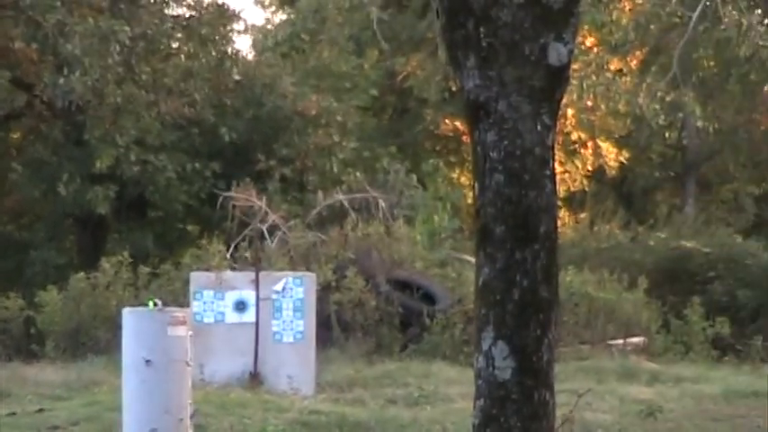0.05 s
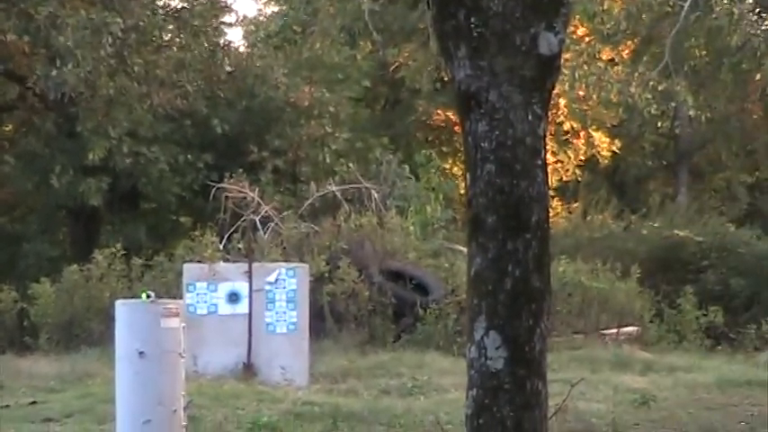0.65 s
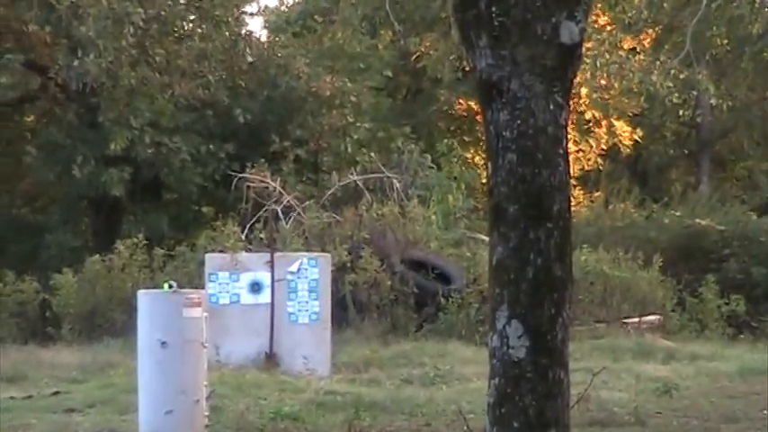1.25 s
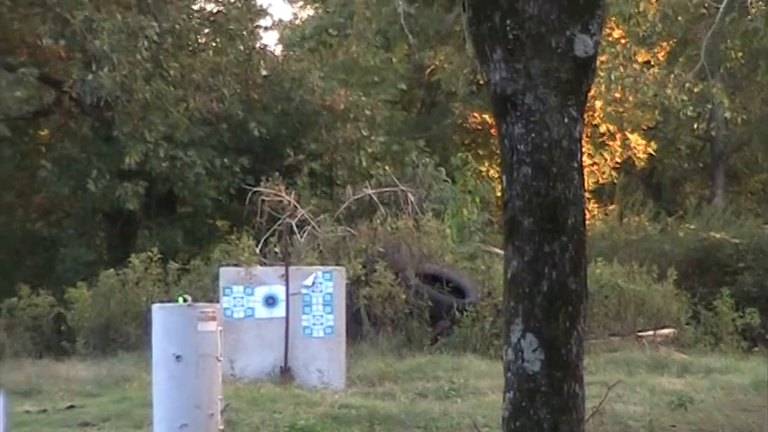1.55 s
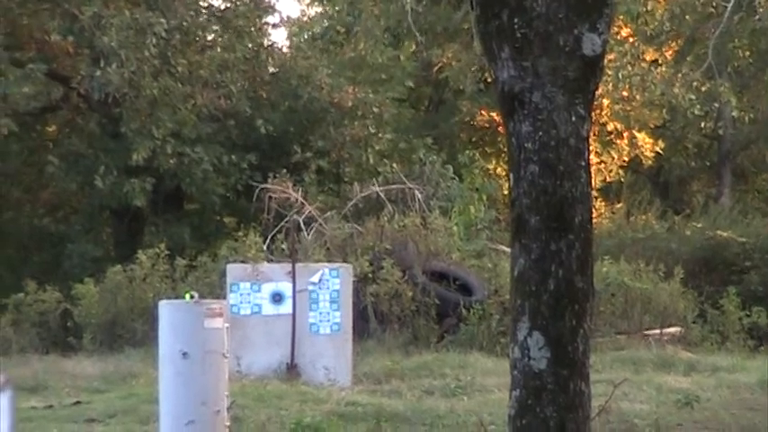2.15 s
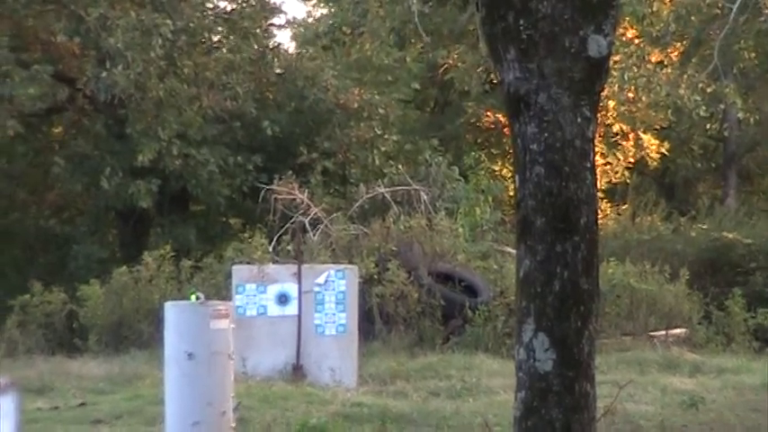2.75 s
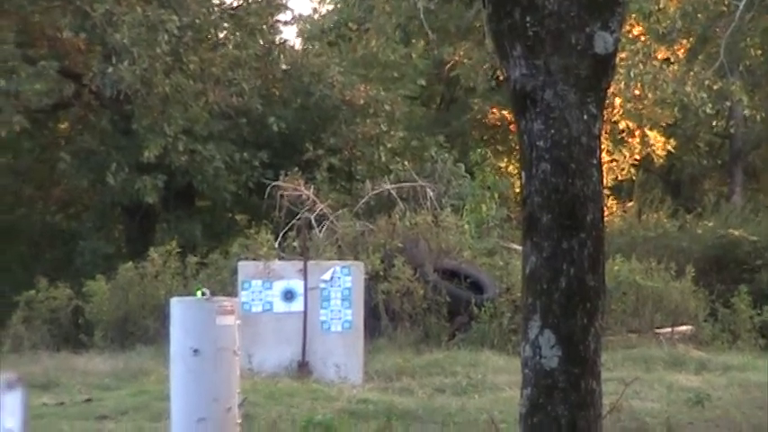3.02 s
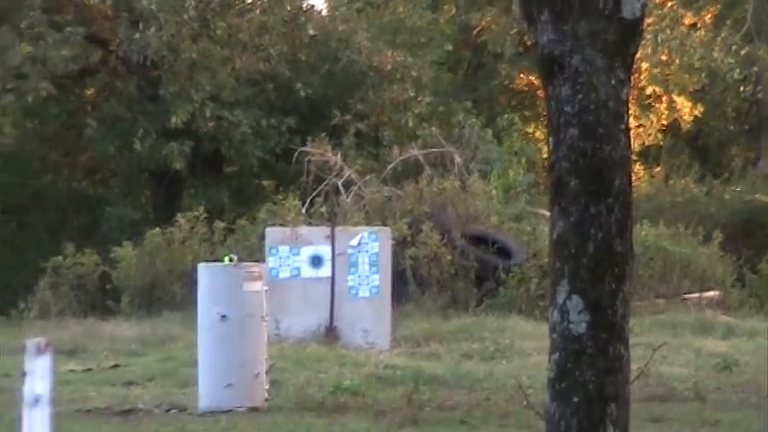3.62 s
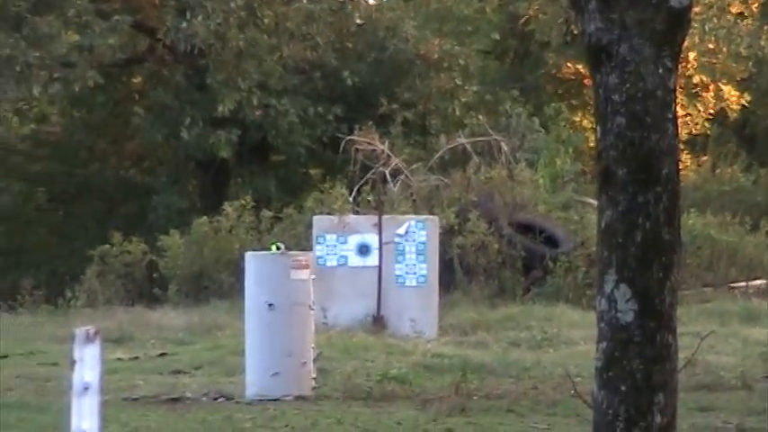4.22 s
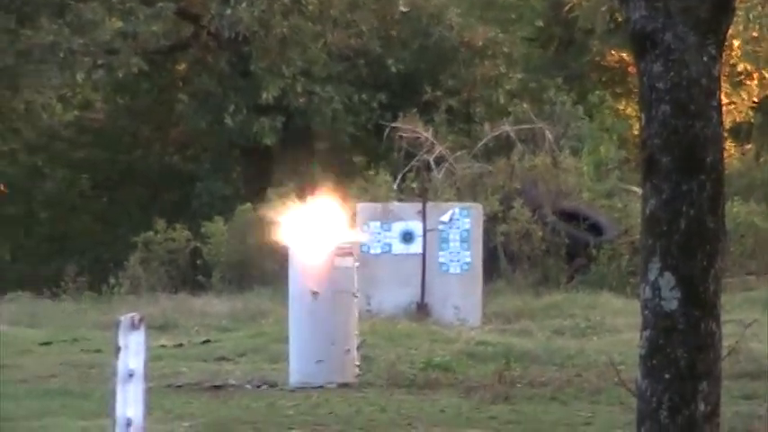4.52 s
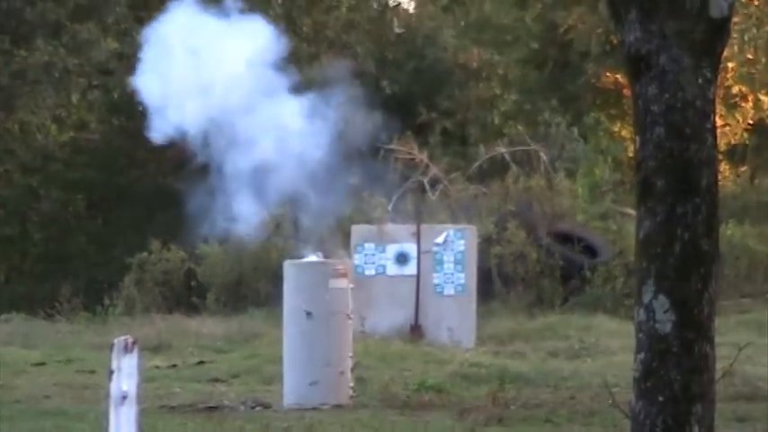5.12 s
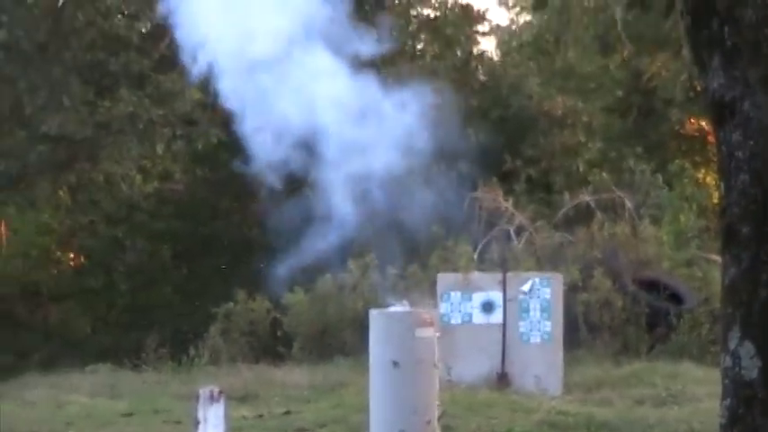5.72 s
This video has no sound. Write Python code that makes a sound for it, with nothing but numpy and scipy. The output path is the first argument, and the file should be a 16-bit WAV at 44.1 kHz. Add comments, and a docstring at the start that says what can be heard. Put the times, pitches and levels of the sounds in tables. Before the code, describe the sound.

Crickets trill faintly, near and far, over a steady hiss at the edge of a field, while a light breeze nudges the microphone. After several seconds a rifle fires close by and a target explodes, merging into one very loud, sharp bang that briefly overloads the microphone. Echoes roll back from the woods, growing duller, and under them the spent brass case lands with a thin ring and tumbles into the grass.

```python
"""A field's edge at dusk, stereo microphone. Over its steady hiss crickets trill with their wings, near
and far, and a light breeze nudges the ports. At about 4.5 s a rifle fires close by and overloads the
input; the exploding target's shock front follows, and both roll back from the woods, ever duller.
Under the echoes the spent brass case lands with a thin ring and tumbles into the grass."""
import sys
import numpy as np
from scipy import signal
from scipy.fft import rfft, irfft, next_fast_len
from scipy.io import wavfile

SR = 44100
rng = np.random.default_rng(int(sys.argv[2]) if len(sys.argv) > 2 else 0)


def persist_wave(psi):
    """Save psi, clipped to +-1, as 16-bit WAV."""
    counts = np.round(np.clip(psi, -1, 1) * 32767).astype(np.int16)
    wavfile.write(sys.argv[1], SR, np.atleast_2d(counts).T)


N = 254324
TIME = np.arange(N) / SR
FFT_SIZE = next_fast_len(N, True)
FREQS = np.fft.rfftfreq(FFT_SIZE, 1 / SR)

# Levels are relative within a table; left-right likeness runs from -1 (opposed) to 1 (alike).
# microphone hiss with far insects in it: f/Hz, level/dB
HISS_SPECTRUM = [(30, 0), (150, -5), (300, -7), (700, -10.5), (1200, -15.5), (2150, -18), (2520, -15),
                 (2850, -19), (3600, -21.5), (4200, -13.5), (5100, -14.5), (5800, -25), (9500, -29),
                 (15500, -38)]
# its stereo image: f/Hz, likeness
HISS_LIKENESS = [(60, -0.45), (640, -0.6), (1400, -0.49), (3100, -0.056), (4200, 0.17), (7000, 0.072),
                 (15000, -0.3)]
# distant tree crickets: f/Hz, level/dB, likeness
TREE_CRICKETS = [(2474, -67.5, -0.055), (2600, -69, 0.48), (2580, -73, .6)]
# crickets near the microphone: start/s, end/s, f/Hz, level/dB
NEAR_TRILLS = [(0, 0.076, 4380, -57), (0.051, 0.517, 4177, -53), (0.451, 0.997, 4180, -57.5),
               (1.152, 1.477, 4240, -62), (1.38, 1.774, 4236, -53.5), (2.348, 2.713, 4206, -56.5),
               (2.85, 3.28, 4203, -50), (3.928, 4.38, 4264, -52), (5.569, 5.8, 4150, -53.5)]
# wind on the ports: f/Hz, level/dB
BREEZE_SPECTRUM = [(15, -10.5), (40, 4), (80, 2.5), (130, -6.5), (200, -12.5), (350, -39), (900, -55)]
# gusts at their height: t/s, level/dB, width/s
GUSTS = [(0.02, -35.5, 0.026), (1.4, -38, 0.038), (2.1, -40.5, 0.43), (2.98, -40, 0.044), (3.35, -43, 0.1),
         (4.12, -46, 0.12)]
# single pushes of air on the ports: t/s, level/dB, width/s
BUFFETS = [(0.309, -22, 0.0032), (1.398, -23, 0.0016), (1.449, -26, .0016), (2.3187, -16, 0.0013),
           (2.3412, -14.5, 0.0013), (2.936, -25, 0.005)]
# rushing noise of the shot and its nearest echoes: t/s, level/dB, hold/s, decay/s, absorption/(dB/kHz)
BURSTS = [(4.4618, -11.5, 0.003, 0.0019, -0.8), (4.4687, 7, 0.0076, 0.0018, 0.77),
          (4.483, -17, 0.02, 0.028, 1), (4.619, -8, 0.0028, 0.00093, 1.3), (4.628, -19, .004, .045, 1.5),
          (4.787, -24.5, 0.027, 0.059, 1.4)]
# fronts of muzzle and target, and slaps off hard reflectors: t/s, level/dB, length/s
SHOCK_FRONTS = [(4.469, -12, 0.0081), (4.4742, 7, 0.002), (4.5072, 2, 0.00175), (4.523, -2, 0.0029),
                (4.5722, 2, .0013), (4.591, 0, 0.00099), (4.6199, 4, .00073), (4.6212, -2, .0042),
                (4.7036, 4, 0.00318), (4.753, -4, 0.002), (5.233, -9, 0.0024)]
# stands of trees, each echo at its height: t/s, boom level/dB, roar level/dB
TREE_STANDS = [(4.51, -34.5, -17), (4.68, -21, -28), (4.83, -20, -31), (4.96, -28, -18),
               (5.55, -21.5, -24.5)]
# low boom of the echoes: f/Hz, level/dB
BOOM_SPECTRUM = [(25, -44), (60, -20), (100, -8.5), (150, -2.5), (190, 1), (245, -1), (310, -7.5),
                 (420, -17), (700, -76)]
# their roar before absorption: f/Hz, level/dB
ROAR_SPECTRUM = [(150, -26), (300, -7), (400, -3), (560, -1), (750, 1.5), (1100, -1.5), (1700, 1),
                 (3000, 0.5), (6000, 1.5), (10000, -1.5), (15000, -8)]
# their stereo image: f/Hz, likeness
ECHO_LIKENESS = [(60, 0.96), (150, 0.98), (320, 0.98), (640, 0.94), (1400, 0.83), (3100, 0.58),
                 (7000, 0.45), (15000, 0.083)]
# the case meeting the ground: t/s, level/dB, hardness (0 to 1)
CASE_CONTACTS = [(5.201, -21.5, 0.83), (5.216, -42, 0.35), (5.510, -38, 0.0079), (5.590, -32.5, .01),
                 (5.625, -43, 0.0093)]
# modes of the brass: f/Hz, level/dB, t60/s
CASE_MODES = [(10680, -0.5, 0.059), (10690, -12, 0.4), (14780, -3, .1), (14800, 4, 0.23), (15400, -7, 0.29),
              (15690, -27, .24)]


def from_db(db):
    """Decibels to gain."""
    return 10 ** (np.asarray(db) / 20)


def at_hz(points, hz):
    """Read a spectrum on a log-frequency axis."""
    f, value = np.transpose(points)
    return np.interp(np.log(hz + 1), np.log(f), value)


def unit_rms(x):
    """Scale to unit power."""
    return x / np.sqrt(np.mean(x ** 2) + 1e-20)


def butter(x, hz, kind, order=2):
    """Causal Butterworth filter."""
    sections = signal.butter(order, np.clip(hz, 10, .45 * SR), kind, fs=SR, output="sos")
    return signal.sosfilt(sections, x + 1e-18)


def add(out, s, sound):
    """Mix a sound in from time s."""
    at = min(max(round(s * SR), 0), N)
    out[..., at:at + sound.shape[-1]] += sound[..., :N - at]


def left_right(mid, side, likeness):
    """Mid and side to a stereo pair."""
    alike = np.clip(likeness, -1, 1)
    return np.sqrt(1 + alike) * mid + np.sqrt(1 - alike) * side * [[1], [-1]]


def stereo_noise(spectrum, likeness, grain=1):
    """Coloured stereo noise of rms 1; grain clumps it in time."""
    mid, side = rfft(rng.standard_normal((2, N)) * grain, FFT_SIZE) * from_db(at_hz(spectrum, FREQS))
    return unit_rms(irfft(left_right(mid, side, at_hz(likeness, FREQS)), FFT_SIZE)[:, :N])


def drift(hz):
    """Random wander of rms 1, mostly slower than hz."""
    return unit_rms(irfft(rfft(rng.standard_normal(FFT_SIZE)) / (1 + (FREQS / hz) ** 2), FFT_SIZE)[:N])


def swell(s, width):
    """Bell-shaped rise and fall around time s."""
    return np.exp(-np.minimum(((TIME - s) / width) ** 2 / 2, 60))


def microphone_hiss(level_db=-48):
    """Steady microphone hiss, wide in the lows, with far insects in it."""
    return from_db(level_db) * stereo_noise(HISS_SPECTRUM, HISS_LIKENESS)


def tree_crickets(width_hz=35):
    """In the distance, many singers on nearly one pitch merge into a wavering tone."""
    out = np.zeros((2, N))
    for hz, db, likeness in TREE_CRICKETS:
        phase = 2 * np.pi * hz * TIME
        mid, side = drift(width_hz) * np.sin(phase), drift(width_hz) * np.cos(phase)
        out += from_db(db) * left_right(mid, side, likeness)
    return out


def far_trills(count=14, every_s=.4, length_s=.48, pitch_hz=4184, spread_hz=99, relative_db=-64):
    """Crickets farther off take turns without a break, each on its own pitch; rows as in NEAR_TRILLS."""
    return [(k * every_s, k * every_s + length_s, pitch_hz + spread_hz * sharper, relative_db)
            for k, sharper in enumerate(rng.standard_normal(count))]


def crickets(strokes_hz=42, stroke_s=.0184, sweep_hz=220, fade_s=.072, scatter_s=.035, scatter_db=5):
    """Each wing stroke is a short falling tone; the brush scatters it differently to each side."""
    out, age = np.zeros((2, N)), TIME[:SR // 6]
    progress = np.minimum(age / stroke_s, 1)
    stroke_shape = np.sin(np.pi * progress) ** 2
    for start, end, pitch_hz, db in NEAR_TRILLS + far_trills():
        count = int((end - start) * strokes_hz) + 1
        late, louder, sharper = rng.standard_normal((64, 3))[:count].T  # no two strokes alike
        onsets = (np.cumsum(1 + .05 * late) - 1) / strokes_hz
        trill = np.zeros(N)
        for k, s in enumerate(onsets):
            hz = pitch_hz + sweep_hz * (1 - 2 * progress) + 20 * sharper[k]
            tone = np.sin(2 * np.pi * np.cumsum(hz) / SR)
            fade = np.clip(.5 + min(s, end - start - s) / fade_s / 2, 0, 1)
            add(trill, s, fade * from_db(2 * louder[k]) * stroke_shape * tone)
        direct = trill[:SR]
        brush = rng.standard_normal((2, len(age))) * np.exp(-age / scatter_s)
        scattered = signal.fftconvolve(direct[None], brush)[:, :SR]
        heard = unit_rms(direct) + from_db(scatter_db) * unit_rms(scattered)
        add(out, start, from_db(db) * np.sqrt(2 * (end - start)) * unit_rms(heard))
    return out


def breeze(lull_db=-51, lumps_db=3.5):
    """Gusts rise out of light air at the microphone; eddies push one port while they pull the other."""
    gust_power = sum(from_db(db) ** 2 * swell(s, width) for s, db, width in GUSTS)
    strength = np.sqrt(from_db(lull_db) ** 2 + gust_power)
    lumps = from_db(lumps_db * drift(hz=21))
    eddies = stereo_noise(BREEZE_SPECTRUM, [(30, -.55), (80, -.9), (300, -.65)], lumps)
    pushes = np.zeros(N)
    for s, db, width in BUFFETS:
        passage = (TIME - s) / width
        pushes += from_db(db) * passage * np.exp((1 - passage ** 2) / 2)
    return strength * eddies + pushes * [[1], [-.65]]


def shot_bursts():
    """The bullet's crack, the muzzle blast and their nearest echoes: each holds briefly, then dies."""
    rush = stereo_noise(spectrum=[(100, -10.5), (600, 2), (15000, -3)],
                        likeness=[(300, .78), (2000, .56), (6000, .32), (9000, 1), (13000, -1.1)])
    size = N // len(BURSTS) // 1024 * 1024  # each burst gets its own stretch of noise
    out, age = np.zeros((2, N)), TIME[:size]
    khz = np.fft.rfftfreq(size, 1 / SR) / 1000
    for k, (s, db, hold, decay, absorption) in enumerate(BURSTS):
        tilted = irfft(rfft(rush[:, k * size:(k + 1) * size]) * from_db(-absorption * khz))
        envelope = np.exp(-np.maximum(age - hold, 0) / decay)
        add(out, s, from_db(db) * envelope * unit_rms(tilted))
    return out


def shock_fronts(port_lag_s=.00006, ground_lag_s=.00415, ground_db=-1.5, ground_fall_db_per_s=68):
    """N-shaped pressure waves reach the left port first; each comes again off the ground."""
    out = np.zeros((2, N))
    for s, db, length in SHOCK_FRONTS:
        progress = (TIME[:SR // 20] - [[0], [port_lag_s]]) / length
        n_wave = (1 - 2 * progress) * (progress >= 0) * (progress < 1)
        front = from_db(db) * butter(n_wave, 3.1 / length, "low")  # long fronts are the dull ones
        add(out, s, front)
        bounce_db = ground_db - ground_fall_db_per_s * (s - SHOCK_FRONTS[0][0])  # long paths are weaker
        add(out, s + ground_lag_s, from_db(bounce_db) * front)
    return butter(out, hz=80, kind="high", order=1)


def through_air(x, db_per_khz):
    """Distance takes the treble in proportion to frequency; the level at 1 kHz is kept."""
    hz, s, frames = signal.stft(x, SR, nperseg=256)
    loss_db = np.outer(np.maximum(hz / 1000, .6) - 1, np.interp(s, TIME, db_per_khz))
    return signal.istft(frames * from_db(-loss_db), SR)[1][:, :N]


def woods_echo(start_s=4.474, onset_s=.004, fall_db_per_s=3, boom_clump_db=2.5, roar_clump_db=1.23):
    """Countless trunks and crowns each send back a little pulse; later ones have crossed more air."""
    delay = np.maximum(TIME - start_s, 0)
    # scattered trees between the stands keep up a slowly sinking boom and roar
    power = from_db(np.array([[-29], [-21]]) - fall_db_per_s * delay) ** 2
    for s, boom_db, roar_db in TREE_STANDS:
        width_s = .021 + .14 * (s - start_s)  # the farther the stand, the longer its swell
        power += from_db([[boom_db], [roar_db]]) ** 2 * swell(s, width_s)
    boom_gain, roar_gain = np.sqrt(power)
    # a few big reflectors make the boom lumpy; leaves and twigs smooth the roar
    clumps = drift(hz=160)
    boom = boom_gain * stereo_noise(BOOM_SPECTRUM, ECHO_LIKENESS, from_db(boom_clump_db * clumps))
    roar = stereo_noise(ROAR_SPECTRUM, ECHO_LIKENESS, from_db(roar_clump_db * clumps))
    roar *= from_db(1) / np.std(butter(roar, [500, 2000], "band"))  # the midrange sets its level
    air_loss, leaf_loss = .92 + 5 * delay, 2 * delay ** 2
    roar = roar_gain * through_air(roar, db_per_khz=air_loss + leaf_loss)
    return (boom + roar) * np.clip(delay / onset_s, 0, 1)


def brass_case(rustle_s=.036, tick_s=.0045, clink_s=.0052, spin_hz=95, pan_db=1):
    """The case rings when it hits something hard and spins away; in the grass it mostly rustles."""
    ringing, contact, age = np.zeros(N), np.zeros(N), TIME[:SR // 2]
    attack = np.minimum(age / .0008, 1)
    for s, db, hardness in CASE_CONTACTS:
        rustle = (1 - .92 * hardness) * np.exp(-age / rustle_s)
        tick = hardness * from_db(3) * np.exp(-age / tick_s)
        add(contact, s, from_db(db) * (rustle + tick))
        for hz, mode_db, t60 in CASE_MODES:
            # contact damps the first swing quickly, then the case rings freely
            fall = from_db(-2) * np.exp(-age / clink_s) + from_db(-13 - 60 * age / t60)
            # spinning turns the lobes of each mode past the microphone
            flutter = 1 + np.cos(2 * np.pi * (spin_hz * rng.uniform(.55, 2.6) * age + rng.random()))
            tone = np.sin(2 * np.pi * (hz * age + rng.random()))
            add(ringing, s, hardness * from_db(db + mode_db) * attack * fall * flutter * tone)
    grass = stereo_noise(spectrum=[(2000, -12), (7000, 3), (11000, -4), (15000, -17.5)],
                         likeness=[(2000, .7), (15000, .47)])
    return ringing * from_db([[pan_db], [-pan_db]]) + from_db(-19) * contact * grass


def scene(shot_pan_db=.35):
    """Hiss, insects and breeze throughout; the shot and what follows sit a little left of centre."""
    hiss = microphone_hiss()
    shot = (shot_bursts() + shock_fronts() + woods_echo()) * from_db([[shot_pan_db], [-shot_pan_db]])
    return hiss + breeze() + shot + brass_case() + crickets() + tree_crickets()


def record(dry, ceiling=.79, cutoff_hz=15800):
    """The microphone input overloads on the loudest peaks; the top is cut steeply."""
    clipped = dry / (1 + (dry / ceiling) ** 6) ** (1 / 6)
    return signal.sosfilt(signal.ellip(10, .2, 80, cutoff_hz, fs=SR, output="sos"), clipped)


dry = scene()
out = record(dry)
persist_wave(out)
```